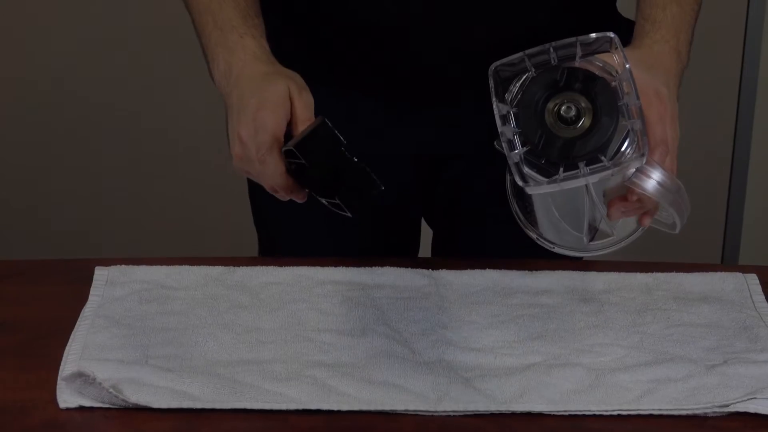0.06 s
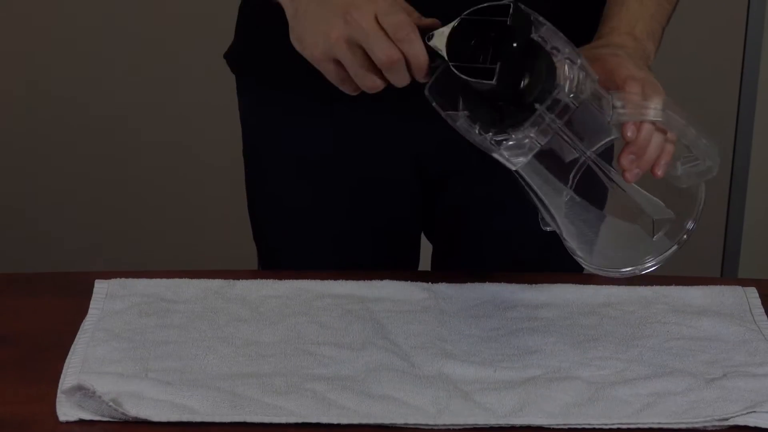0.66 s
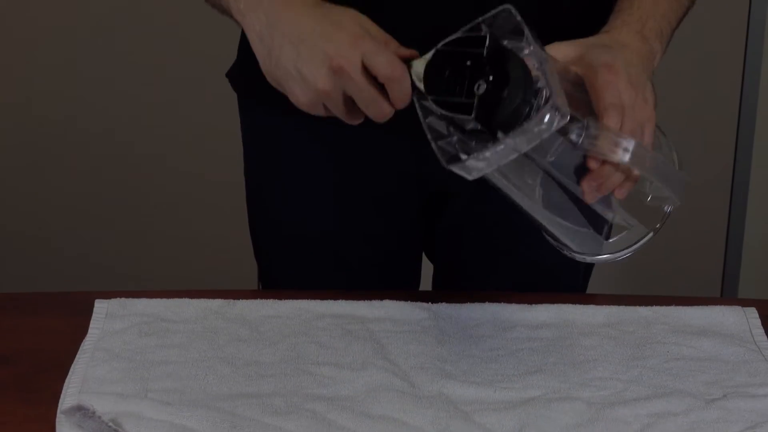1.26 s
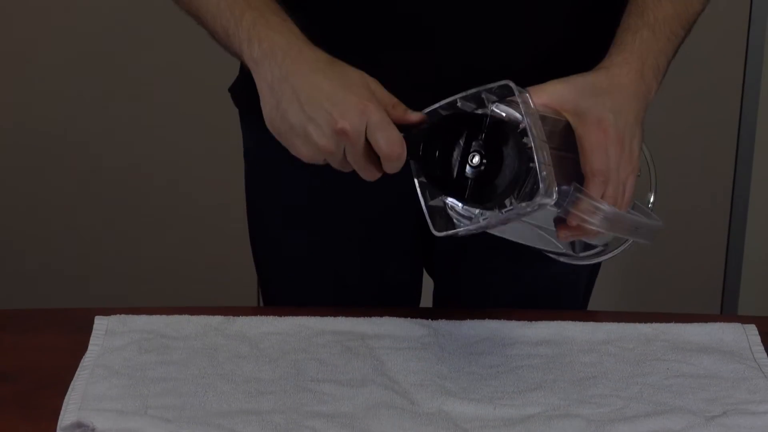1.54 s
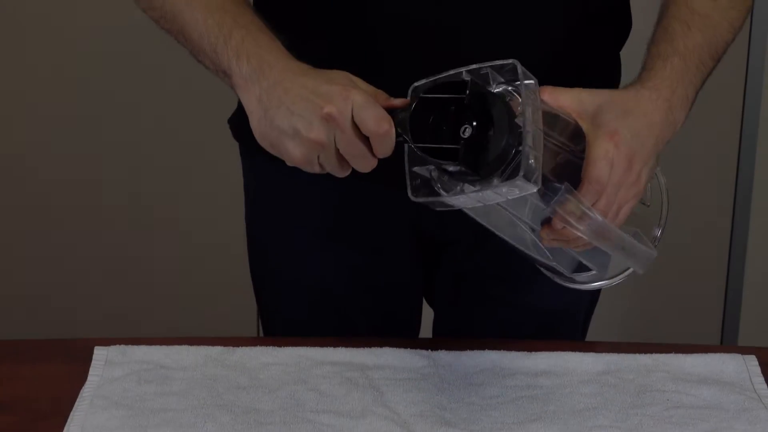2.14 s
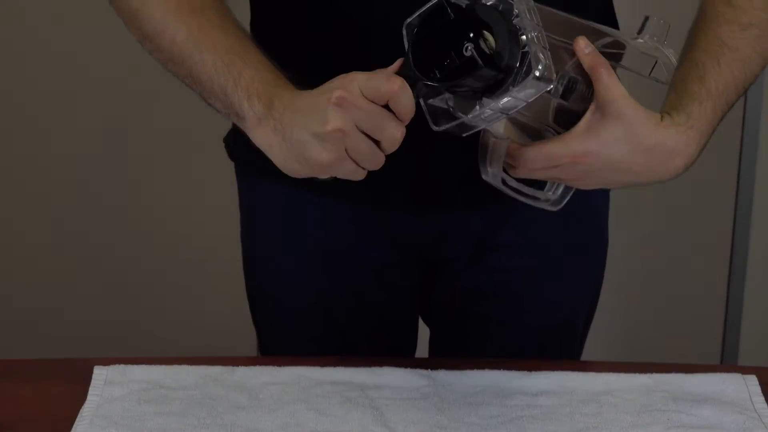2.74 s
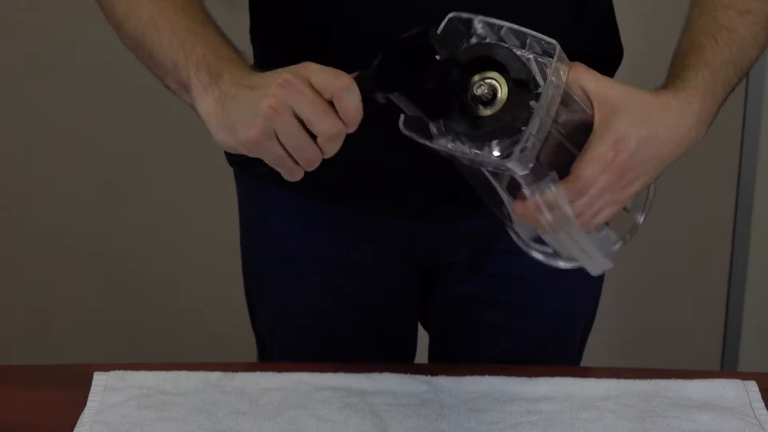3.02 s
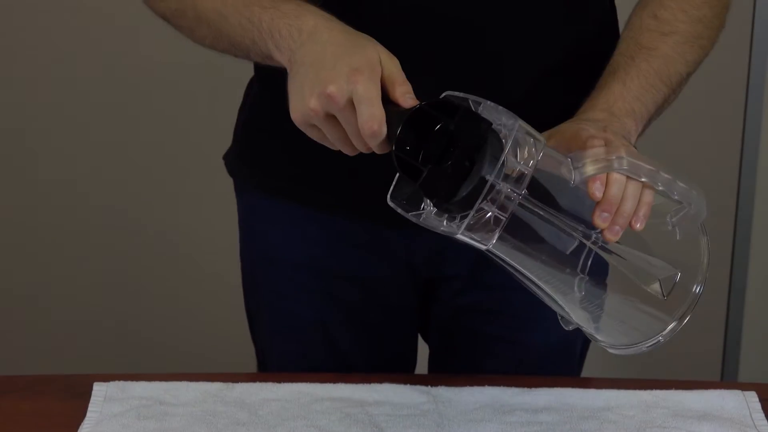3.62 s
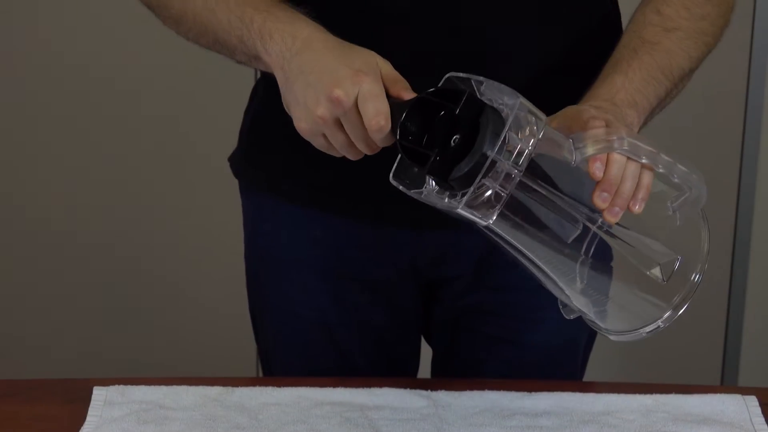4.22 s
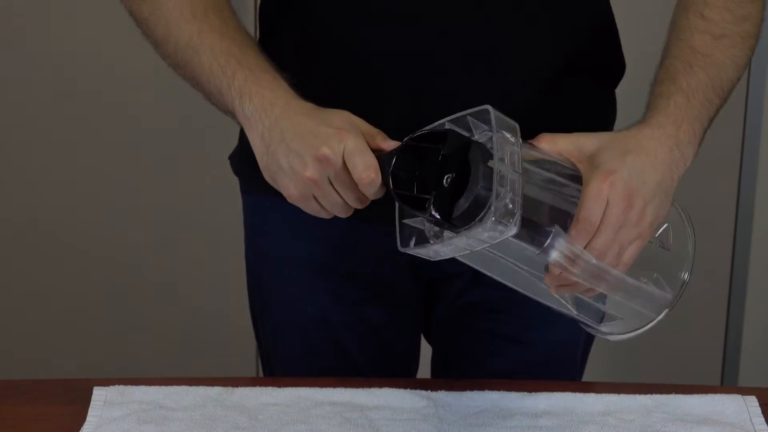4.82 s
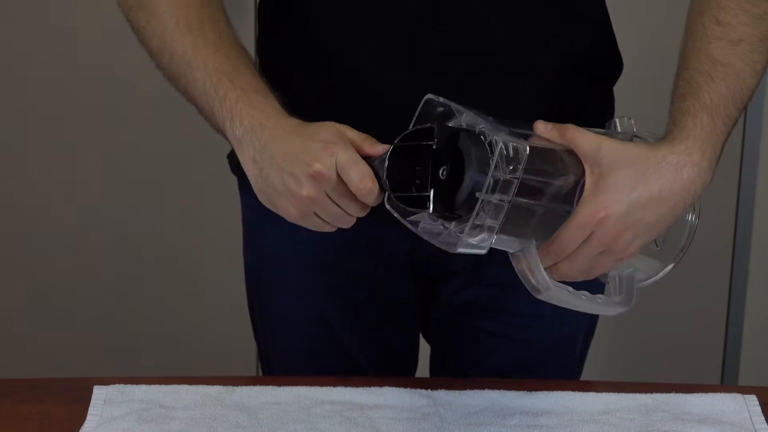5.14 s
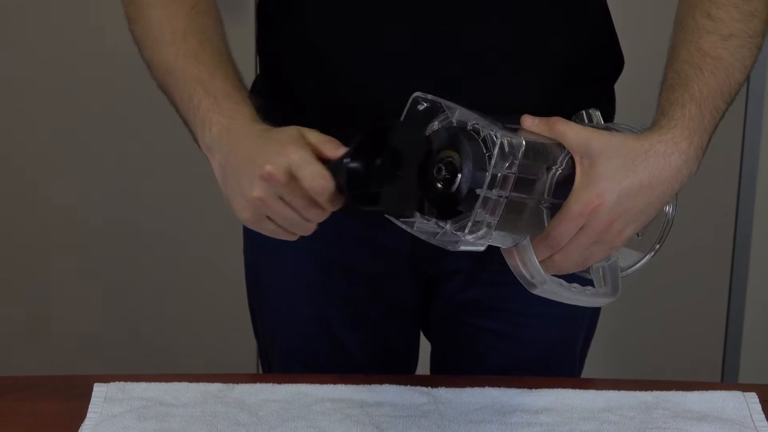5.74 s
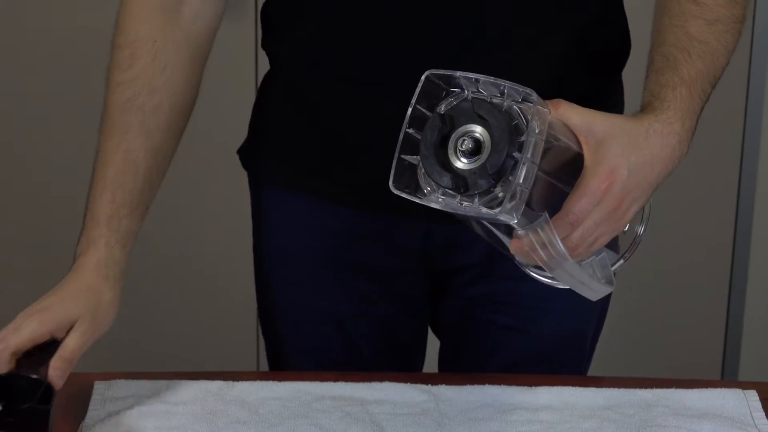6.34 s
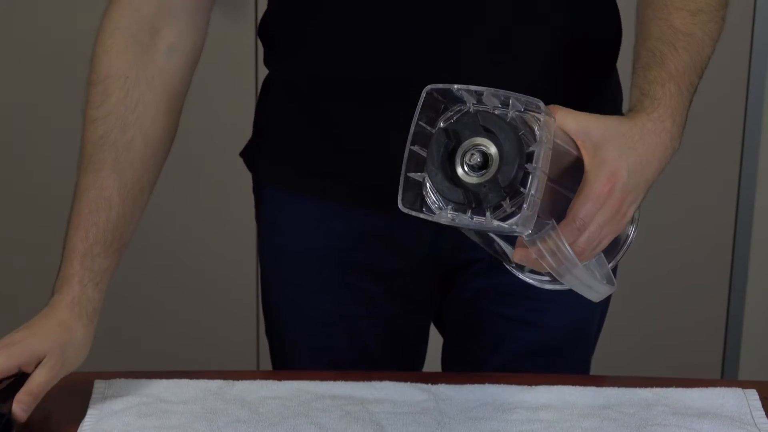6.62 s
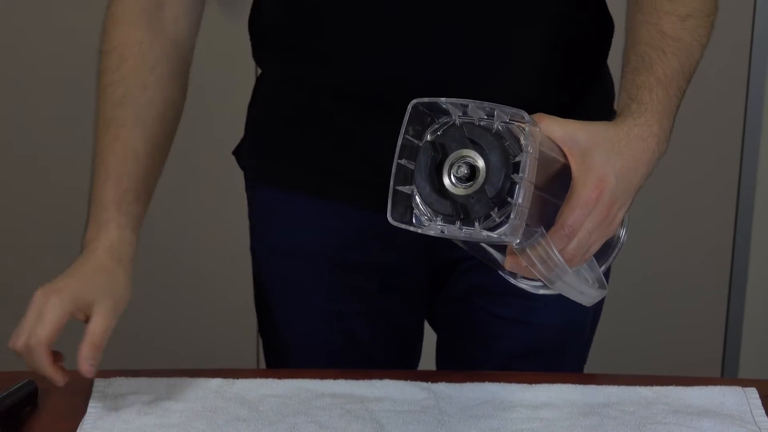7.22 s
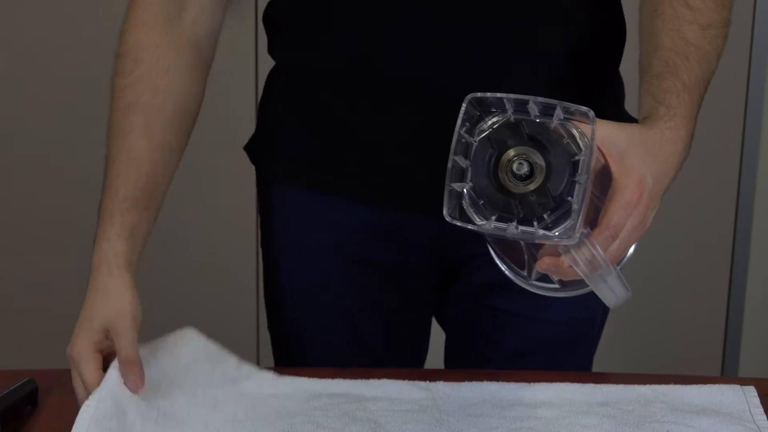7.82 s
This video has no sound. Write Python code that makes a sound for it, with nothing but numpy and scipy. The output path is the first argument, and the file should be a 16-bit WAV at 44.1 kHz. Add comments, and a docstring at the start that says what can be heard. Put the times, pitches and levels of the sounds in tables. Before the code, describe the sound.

An empty plastic jar ticks faintly in a hand. A plastic wrench squeaks and clacks onto its base, then knocks, rubs and chatters in irregular clusters as it is turned, each knock briefly ringing the hollow jar. It comes off with a faint ping and clatters onto a wooden table, and fingers softly brush a towel. The sound is close and in stereo, in a small room with quiet ventilation.

```python
"""Faint ticks of an empty plastic jar shifting in a hand, close to a microphone pair in a small room.
A plastic wrench squeaks onto the jar's base, is turned, and is pulled off with a faint ping. Each knock
rings the jar's walls, hollow and blades and the wrench's prongs; in between, the wrench chatters and rubs.
Last, it is laid on a wooden table and a hand takes up a towel. Ventilation runs softly underneath."""
import sys
import numpy as np
from scipy import signal
from scipy.fft import rfft, irfft
from scipy.io import wavfile
from scipy.ndimage import uniform_filter1d

SR = 44100
rng = np.random.default_rng(int(sys.argv[2]) if len(sys.argv) > 2 else 0)


def master_out(mix):
    """Clip the mix to full scale and print it as 16-bit PCM to the path in sys.argv[1]."""
    frames = np.transpose(np.atleast_2d(mix))
    ceiling = np.clip(frames, -1, 1)
    pcm = np.round(ceiling * 32767).astype(np.int16)
    wavfile.write(sys.argv[1], SR, pcm)


N = 356095

# Modes of the jar's walls, its blades and the wrench's prongs: pitch_hz, relative_db, base_t60_s
WALLS = [(992, -19.5, 0.056), (1411, -16.5, 0.21), (1473, -8.5, .08), (1591.6, -1, 0.069),
         (1708, -0.5, 0.057), (1775, -8.5, 0.15), (1861, -2, 0.06), (2005, -5.5, 0.064), (3223, -14.5, .07),
         (3760, -21, 0.11), (3960, -24.5, 0.14)]
BLADES = [(5750, -9.5, .15), (6500, -3, 0.15), (6550, -5, .15), (7900, -20, 0.091), (10800, -8.5, .1)]
PRONGS = [(2140, -8, 0.055), (2262, -2.5, 0.041), (2270, -0.5, 0.054), (2363, -3.5, .06), (2440, 3, 0.04),
          (2706, -5, 0.077), (2806, -6.5, 0.059), (4620, -28.5, 0.056), (4497, -27.5, 0.051),
          (5800, -35, 0.087)]
# Spectra of quickly damped plastic, from dull to bright: frequency_hz, relative_db
THUD = [(30, -38), (120, -36), (200, -11), (420, -1), (560, 2), (680, -6.5), (950, 1.5), (1250, -4),
        (1700, -3.5), (3000, -41), (6000, -70)]
CRACK = [(200, -73), (1500, -27.5), (2900, 4.5), (3500, 0), (3900, 2), (4200, -2.5), (4700, 2.5),
         (5100, -1.5), (5500, -3), (6100, -4), (7000, -9.5), (11000, -36.5)]
SNAP = [(300, -67.5), (3000, -31.5), (5900, -9), (6550, -1.5), (7200, 1.5), (8000, 1.5), (9100, -1.5),
        (10300, 1.5), (11500, -8.5)]


def knocks():
    """Each contact shares its energy between the jar's walls, hollow and blades and the wrench's prongs."""
    # Modes of the air in the jar: pitch_hz, relative_db, base_t60_s
    hollow = [(335.9, -10, .17), (365, -4.5, 0.19)]
    # Midrange clack of plastic on plastic: frequency_hz, relative_db
    clack_spectrum = [(100, -72), (600, -42.5), (1200, -3.5), (1650, -11), (2000, 7.5), (2400, -18),
                      (2800, -10.5), (3300, -18.5), (6000, -47)]
    thud, clack, crack, snap = (causal(c) for c in (THUD, clack_spectrum, CRACK, SNAP))
    out = np.zeros(N)
    for s, force_db, lean_db, weight_db, edge_db, lift_db in contacts():
        firm_db = force_db + 25  # above zero for a firm blow
        wall_db, prong_db = split(force_db, lean_db)
        # Firm blows crack; lighter ones snap higher.
        crack_db, snap_db = split(force_db + edge_db, -8 - 0.44 * firm_db)
        clack_db = (wall_db + prong_db) / 2 - 8
        thud_db = force_db + weight_db - 4.5
        hollow_db = force_db + 0.37 * weight_db + lift_db - 13
        # A loose contact is bright and rings on; a dull, firmly pressed one is damped.
        hold = np.clip(0.87 * amp(0.19 * edge_db - 0.07 * firm_db), 0.2, 2)
        add(out, s, amp(wall_db - 1.5) * ring(WALLS, hold, spread_db=5, detune=0.0046))
        add(out, s, amp(hollow_db) * ring(hollow, hold, spread_db=7, detune=0.0071))
        add(out, s, amp(prong_db + 1) * ring(PRONGS, hold, spread_db=4, detune=0.0029))
        add(out, s, amp(snap_db - 15.5) * ring(BLADES, hold, spread_db=0.5, detune=0.0014))
        add(out, s, amp(clack_db) * burst(clack, t60_s=0.035 * hold, tick=3))
        add(out, s, amp(thud_db) * burst(thud, t60_s=0.14 * hold, tick=3.3))
        add(out, s, amp(crack_db) * burst(crack, t60_s=0.079 * hold, tick=2.9))
        add(out, s, amp(snap_db - 2.9) * burst(snap, t60_s=0.07 * hold, tick=8.1))
    return out


def contacts():
    """Lists the single knocks, then the strike and two rebounds each time the wrench seats."""
    # Wrench on jar: start_s, force_db, lean_db, weight_db, edge_db
    # Lean favours the prongs over the walls, weight adds bass, edge adds treble.
    single_knocks = [(.772, -38, -5, -1.5, -16), (0.8598, -39, -2, -3.5, -14),
                     (.94, -43.5, -16, -10.5, -25), (1.036, -42, 3, -6, -11), (1.1821, -29, -2.5, -21, -22),
                     (1.2394, -33, -6, -4, -27), (1.9442, -40.5, 1, 3, -3.5), (2.0427, -39, -3.5, 6, -10),
                     (2.1213, -46.5, -17.5, 9, -26), (2.196, -52, -1, -4.5, -7.5),
                     (2.2668, -42, 3, 1.5, -18.5), (2.289, -49.5, 3, 0.5, -16), (2.321, -39.5, -4, -3, -23),
                     (2.4271, -39, -3.5, -13, -23.5), (2.487, -45.5, 8, -9, -21),
                     (2.5075, -37.5, -6, -2, -25.5), (2.582, -49, 12, 7, -10.5), (2.604, -37, -13, -2, -13),
                     (2.6208, -22.5, 1, -8.5, -11.5), (2.8001, -21, 4.5, -26.5, -18.5),
                     (2.8517, -22, -12, -26, -12), (2.8764, -37.5, -15, 1.5, 5), (3.014, -45.5, 12, -6, -3),
                     (3.5415, -42.5, -1.5, -3, -26.5), (3.604, -51.5, -6, 6, -29),
                     (3.8587, -26.5, -10, -15, -19), (3.8825, -31.5, -4.5, -24, -17),
                     (4.087, -49, 0, 6, -5), (4.1133, -31, 4, -13, -19), (4.135, -31, -5.5, 0, -7),
                     (4.1892, -23.5, -10, -18, -10.5), (4.229, -26, -6, -18, -7.5),
                     (4.2544, -23.5, -1.5, -23, -10.5), (4.405, -35, 1, -3.5, -8.5),
                     (4.519, -35, -2.5, 0, -8.5), (4.589, -30, -6, 3, -15), (5.478, -45, -10.5, 0.5, -8.5),
                     (5.6821, -44, -9, 1.5, -8), (5.729, -39.5, -10.5, -7.5, -18.5)]
    # The wrench rocks in its seat: start_s, force_db, lean_db, weight_db, edge_db, rebound_gap_s
    seatings = [(0.6946, -23, 0, -16, -16.5, .0165), (1.0458, -18, -7.5, -12, -22.5, .0102),
                (3.7371, -20.5, -8, -20, -17, .0135), (4.1459, -16.5, -4, -24, -11, .0162)]
    rows = [(*row, 0) for row in single_knocks]
    for s, force_db, lean_db, weight_db, edge_db, gap_s in seatings:
        for k in range(3):  # each rebound is weaker and falls more on the prongs
            lift_db = 10.5 if k == 1 else 0  # the first bottoms out and rings the hollow louder
            rows.append((s + k * gap_s, force_db - 4 * k, lean_db + 6.5 * k, weight_db, edge_db, lift_db))
    return rows


def drags():
    """The prongs jerk and skip over the ribs: fast slips keep the same modes ringing."""
    # Slides that run out: start_s, relative_db, hiss_over_tone_db, fade_db_per_s
    slides = [(.695, -24.5, -18, 85), (2.845, -35.5, -15.5, 84.5), (3.536, -39.5, -31, 54),
              (4.115, -23, -22.5, 99.5), (4.142, -14.5, -3, 150.5), (4.279, -23.5, -3.5, 140)]
    body = ring(PRONGS, hold=0.93) + amp(-6.5) * ring(WALLS, hold=0.53)
    treble = causal(CRACK) + amp(-12) * causal(SNAP)
    train = slips(per_s=1100, spread_db=-1.5)
    tone, hiss = unit(through(train, body)), unit(through(train, treble))
    out = np.zeros(N)
    for s, db, hiss_db, fade in slides:
        push = amp(db - 9.5) * stroke(s, rise_s=0.006, fade_db_per_s=fade)
        out += push * (tone + amp(hiss_db) * hiss)
    return out


def squeak(waver=0.01, ramp_s=0.006):
    """Slips lock onto one of a prong's modes: an unsteady tone with its octave."""
    # Spurts as the prong first slides onto the base: start_s, length_s, pitch_hz, level_db
    spurts = [(0.691, 0.052, 2262, -22), (0.755, .036, 2736, -37), (0.801, 0.035, 2262, -33),
              (0.881, 0.024, 2270, -37.5)]
    t, out = np.arange(N) / SR, np.zeros(N)
    drift, grip = (unit(uniform_filter1d(rng.standard_normal(N), size=300)) for _ in range(2))
    wavering_time = np.cumsum(1 + waver * drift) / SR
    for s, length_s, hz, db in spurts:
        gate = np.clip(np.minimum(t - s, s + length_s - t) / ramp_s, 0, 1)
        phase = 2 * np.pi * hz * wavering_time
        out += amp(db) * gate * (np.sin(phase) + amp(-25) * np.sin(2 * phase))
    return amp(1.3 * grip) * out


def rub():
    """The base turns in its thread with a short dry rasp."""
    # Thread friction: frequency_hz, relative_db
    thread = [(100, -36), (250, -34), (350, -2.5), (530, 4), (640, -10), (900, -6.5), (1400, -9),
              (1650, -12), (1790, 1), (1950, -11), (2600, -12.5), (4000, -24), (7000, -31.5), (11000, -29)]
    push = amp(-35) * stroke(start_s=1.853, rise_s=0.039, fade_db_per_s=158)
    return push * unit(through(slips(per_s=3000, spread_db=4.5), causal(thread)))


def set_down():
    """The wrench meets the wood dully, then tips over, rings freely and bounces."""
    # Landings: start_s, body_db, wood_over_body_db, ring_over_body_db
    landings = [(6.7172, -41.5, 15, -27), (6.831, -21.5, -10.5, -4)]
    # Spectra of the wrench's body and the tabletop: frequency_hz, relative_db
    clatter = [(60, -48), (150, -19.5), (240, 1), (350, -13.5), (450, 8.5), (620, -13.5), (1300, 0),
               (1500, -3), (2000, -2), (2500, -6), (3150, -3), (4000, -18.5), (6000, -28.5), (11000, -46.5)]
    wood = [(35, -72), (60, -49), (242, -12.5), (336, -12), (427, -0.5), (660, -5.5), (1240, -0.5),
            (1960, -22), (2670, -27), (11000, -66), (14300, -90), (22000, -120)]
    # Modes of the free wrench: pitch_hz, relative_db, t60_s
    loose_wrench = [(1505, 5, .12), (1636, 2, 0.09), (1820, 3, 0.064), (1914, 0.5, 0.066),
                    (2240, -12, 0.069), (2680, -17, 0.16), (3040, -15, .18), (3106, -3.5, 0.17),
                    (3220, -9, 0.16)]
    out = np.zeros(N)
    for s, body_db, wood_db, ring_db in landings:
        for delay_s, bounce_db in [(0, -4), (0.011, -5.5), (0.022, -7.5)]:
            force = amp(body_db + bounce_db)
            add(out, s + delay_s, force * burst(causal(clatter), t60_s=0.076, tick=1.7))
            add(out, s + delay_s, force * amp(wood_db) * burst(causal(wood), t60_s=0.19, tick=4.4))
            add(out, s + delay_s, force * amp(ring_db) * ring(loose_wrench, detune=0.0035))
    return out


def jolt(centre_s=4.1435, pitch_hz=100, level_db=-47.5):
    """As the wrench breaks loose, the whole jar jerks and pushes the air once."""
    u = np.pi * pitch_hz * (np.arange(N) / SR - centre_s)
    return amp(level_db) * (2 * u ** 2 - 1) * np.exp(-u ** 2)


def regrips():
    """The jar ticks under the fingers and bumps softly against the palm."""
    # Shifts in the hand: start_s, tick_db, bump_db
    shifts = [(.0295, -61, -63), (.162, -57.5, -52.5), (.4025, -60, -72), (1.3578, -57.5, -52),
              (1.432, -76, -51.5), (3.311, -66, -74.5), (4.93, -66, -50.5), (5.2334, -65.5, -55),
              (5.302, -85, -53.5), (5.913, -57, -55)]
    out = np.zeros(N)
    for s, tick_db, bump_db in shifts:
        add(out, s, amp(tick_db - 6) * burst(causal(SNAP), t60_s=0.036, tick=5.3))
        add(out, s, amp(tick_db - 5) * burst(causal(CRACK), t60_s=0.06, tick=4))
        add(out, s, amp(bump_db - 2) * burst(causal(THUD), t60_s=0.093, tick=4.4))
        add(out, s, amp(bump_db - 8) * ring(WALLS, hold=0.73, spread_db=0.5, detune=0.0033))
    return out


def ping(start_s=5.6825, level_db=-57):
    """Coming off, the wrench catches the steel drive and the blades' two strongest modes ring freely."""
    out = np.zeros(N)
    add(out, start_s, amp(level_db) * ring(BLADES[1:3], hold=1.3, spread_db=0.5, detune=0.0014))
    return out


def towel():
    """Fingers brush and lift the cloth."""
    # Cloth friction: frequency_hz, relative_db
    cloth = [(300, -14), (900, 7), (2500, -3), (4000, -13), (7000, -20), (11000, -32.5)]
    brush = amp(-58.5) * stroke(start_s=7.51, rise_s=0.13, fade_db_per_s=44)
    return brush * unit(through(slips(per_s=2500, spread_db=2.5), causal(cloth)))


def ventilation(level_db=-53.5):
    """Room tone: steady ventilation noise, as mid and side."""
    # Moving air: frequency_hz, relative_db
    spectrum = [(15, -58.5), (25, -33.5), (117, -19.5), (132, -13.5), (167, -3), (317, -8), (602, -4.5),
                (1060, -10.5), (1230, -12.5), (2120, -24), (2280, -23.5), (2730, -28.5), (8670, -36),
                (10600, -35), (11500, -46), (15000, -71), (22000, -120)]
    # Broad room resonances: centre_hz, width_hz, lift_db
    resonances = [(170, 40, 2.5), (593, 99, 5)]
    # Stereo width: frequency_hz, side_db
    width = [(60, -14), (110, -31.5), (190, -24.5), (350, -17.5), (620, -13.5), (1110, -8), (2000, -5.5),
             (3580, -2.5), (6430, -3.5), (11500, -4)]
    hz = np.fft.rfftfreq(N, 1 / SR)
    lift_db = sum(db * np.exp(-((hz - centre) / span) ** 2) for centre, span, db in resonances)
    noise = rfft(rng.standard_normal((2, N))) * amp(read(spectrum, hz) + lift_db)
    mid = irfft(noise[0], N)
    side = irfft(noise[1] * amp(read(width, hz)), N)
    return amp(level_db) * np.array([mid, side]) / mid.std()


def room(x, wet_db, build_s, near_side_db, echo_db):
    """Direct sound, near echoes and a diffuse tail reach the microphones, as mid and side."""
    # Decay of the tail: frequency_hz, t60_s
    decay = [(200, 0.45), (350, 0.73), (600, 0.29), (1400, .47), (3700, 0.61), (10000, 0.51)]
    # Colour of the tail: frequency_hz, relative_db
    colour = [(100, -2.5), (250, -11), (350, -0.5), (600, 5), (1500, -0.5), (2500, -2.5), (4000, -1.5),
              (11000, -0.5)]
    # Stereo width: frequency_hz, side_db
    width = [(50, -13.5), (150, -21.5), (350, -21), (700, -11), (1400, -7.5), (2300, -5), (4500, -1.5),
             (11000, -2.5)]
    # Echoes off table, floor and walls: delay_s, relative_gain
    echoes = [(.0023, 0.21), (0.0115, 0.16), (0.0147, 0.2), (0.0187, .17), (0.027, 0.098)]
    hz, t, noise = signal.stft(rng.standard_normal((2, SR)), SR, nperseg=256)
    fall = amp(read(colour, hz)[:, None] - 60 * t / read(decay, hz)[:, None])
    tail = signal.istft(noise * fall, SR, nperseg=256)[1]
    tail *= 1 - np.exp(-np.arange(tail.shape[1]) / SR / build_s)
    mid, side = amp(wet_db) * tail / np.linalg.norm(tail[0])
    mid[0] += 1  # direct sound
    near = rng.standard_normal(200)  # scatter close to the microphones differs between them
    add(side, 0, amp(near_side_db) * near / np.linalg.norm(near))
    for s, gain in echoes:
        add(mid, s, amp(echo_db) * np.array([gain]))
        add(side, s, amp(echo_db) * gain * rng.choice([-1, 1], size=1))
    return np.array([through(x, mid), through(x, through(side, causal(width)))])


def ring(modes, hold=1, spread_db=0, detune=0):
    """Damped modes; contact point and grip vary their strength and pitch, hold scales their ring time."""
    t = np.arange(int(0.4 * SR)) / SR
    hz, db, t60_s = np.transpose(modes)[:, :, None]
    strength, shift, polarity = rng.standard_normal((3, len(modes), 1))
    fall = amp(db + spread_db * strength - 60 * t / (t60_s * hold))
    swell = 1 - np.exp(-(hz * t / 0.94) ** 2)  # a mode builds up over about one cycle
    tones = np.sign(polarity) * np.sin(2 * np.pi * hz * (1 + detune * shift) * t)
    return unit_attack((swell * fall * tones).sum(0))


def burst(response, t60_s, tick):
    """A contact tick followed by a crowd of heavily damped modes."""
    t = np.arange(5000) / SR
    noise = rng.standard_normal(len(t)) * amp(-60 * t / t60_s)
    noise[0] += tick
    return unit_attack(through(noise, response))


def slips(per_s, spread_db):
    """Stick-slip: a random train of small clicks of uneven size."""
    size = amp(spread_db * np.minimum(rng.exponential(1, N), 3)) * rng.choice([-1, 1], N)
    return size * (rng.random(N) < per_s / SR)


def stroke(start_s, rise_s, fade_db_per_s):
    """Envelope of one stroke: the power builds evenly, then fades at a steady rate."""
    t = np.arange(N) / SR - start_s
    return np.sqrt(np.clip(t / rise_s, 0, 1)) * amp(-fade_db_per_s * np.maximum(t - rise_s, 0))


def split(db, tilt_db):
    """Shares a level between two parts, the second tilt_db above the first."""
    first_db = db - 10 * np.log10(1 + amp(tilt_db) ** 2)
    return first_db, first_db + tilt_db


def amp(db):
    """Decibels to gain."""
    return 10 ** (np.asarray(db) / 20)


def unit(x):
    """Scales to rms 1."""
    return x / np.sqrt(np.mean(x ** 2) + 1e-20)


def unit_attack(x):
    """Scales a dying sound to rms 1 over its first 10 ms."""
    return x / np.sqrt(np.mean(x[:SR // 100] ** 2) + 1e-20)


def read(points, hz):
    """Reads a table on a log-frequency axis."""
    f, value = np.transpose(points)
    return np.interp(np.log(hz + 1), np.log(f + 1), value)


def add(mix, s, sound):
    """Adds a sound into the mix at time s."""
    part = mix[round(s * SR):][:len(sound)]
    part += sound[:len(part)]


def causal(spectrum):
    """Shortest impulse response that has the given spectrum."""
    hz = abs(np.fft.fftfreq(2048, 1 / SR))
    log_gain = np.log(amp(np.maximum(read(spectrum, hz), -100)))
    return np.fft.ifft(np.exp(np.conj(signal.hilbert(log_gain)))).real


def through(x, response):
    """Convolves and keeps the length."""
    return signal.fftconvolve(x, response)[:len(x)]


def scene():
    """Hands and table in the small room, heard left and right by a close pair of microphones."""
    in_hand = knocks() + ping() + regrips() + drags() + squeak() + rub() + jolt()
    handled = room(in_hand, wet_db=-3, build_s=0.0035, near_side_db=-7, echo_db=3.5)
    table = room(set_down() + towel(), wet_db=-4, build_s=0.0019, near_side_db=-2.5, echo_db=-4)
    mid, side = handled + table + ventilation()
    return np.array([mid + side, mid - side])


def record(dry):
    """The recorder cuts the top treble steeply."""
    cutoff_hz = 11130
    lowpass = signal.firwin(401, cutoff_hz, window=("kaiser", 7), fs=SR)
    return signal.oaconvolve(dry, lowpass[None], "same")


dry = scene()
out = record(dry)
master_out(out)
```